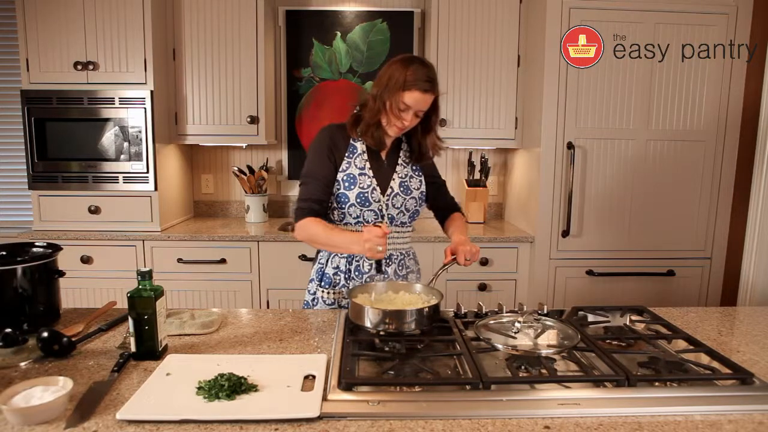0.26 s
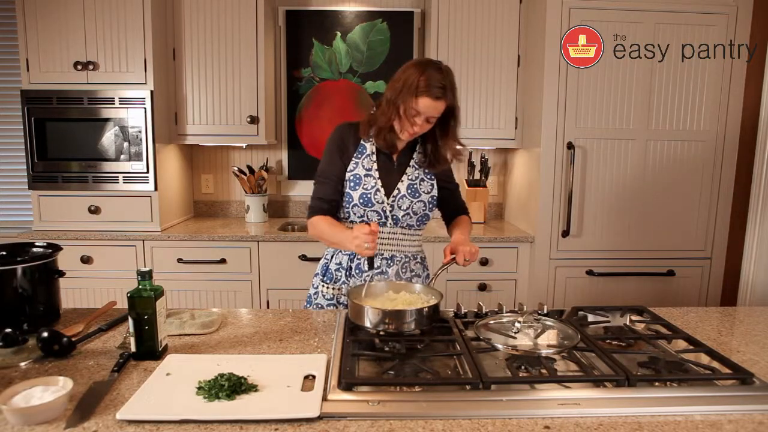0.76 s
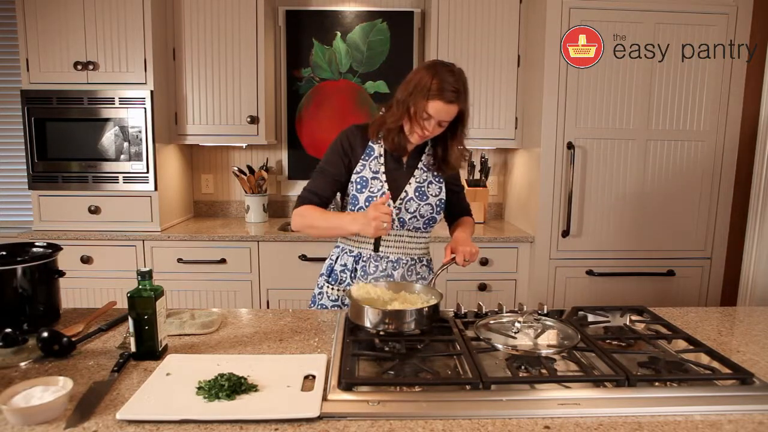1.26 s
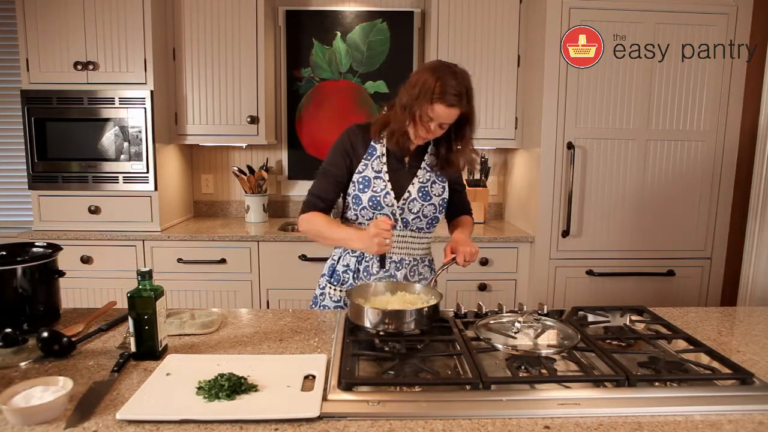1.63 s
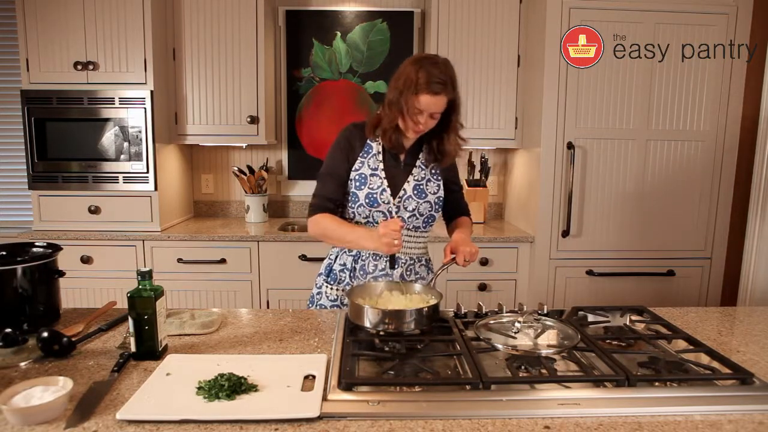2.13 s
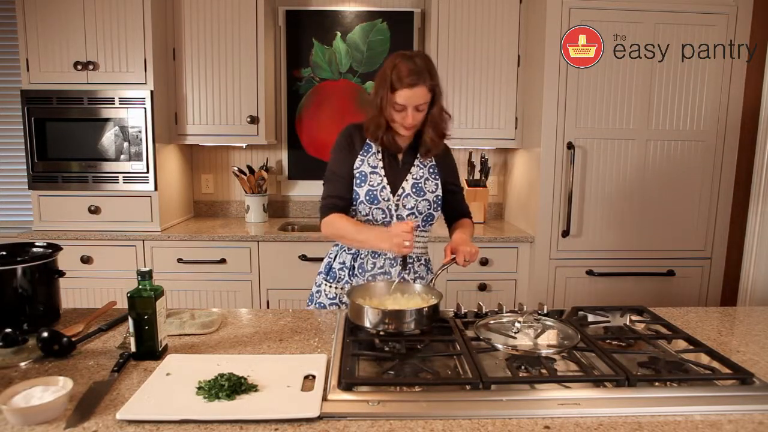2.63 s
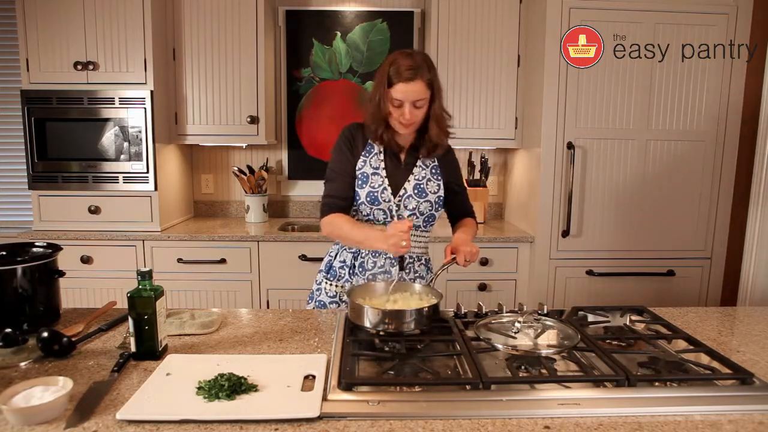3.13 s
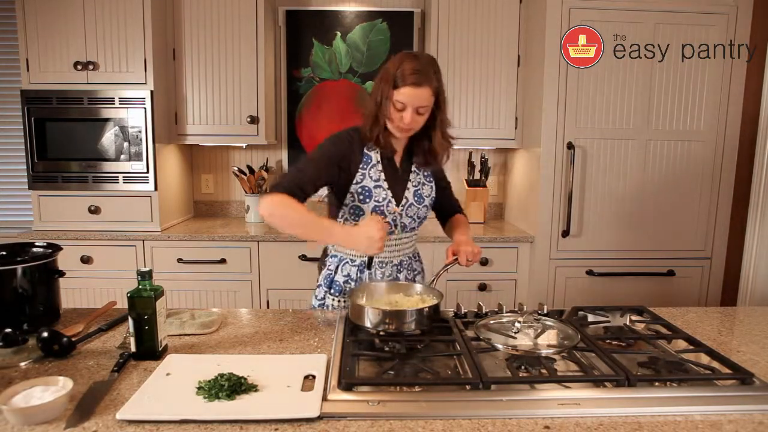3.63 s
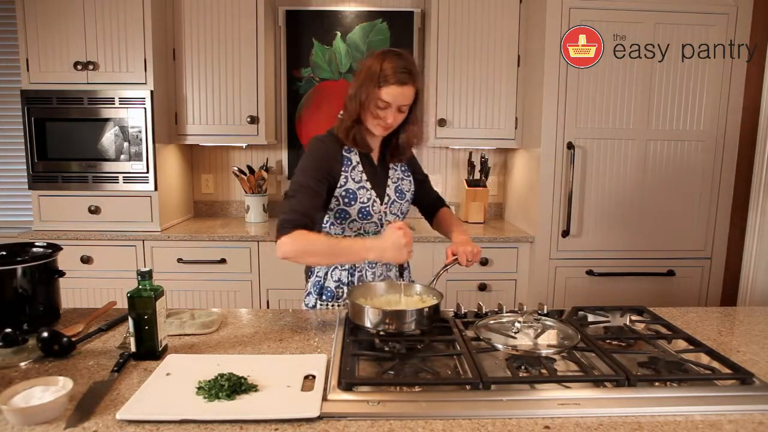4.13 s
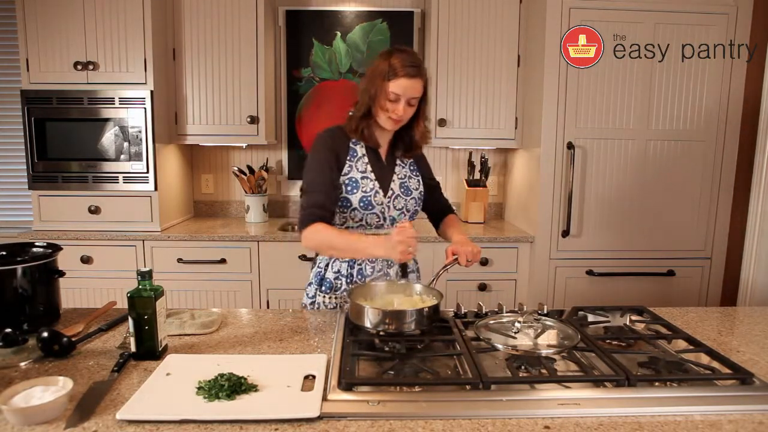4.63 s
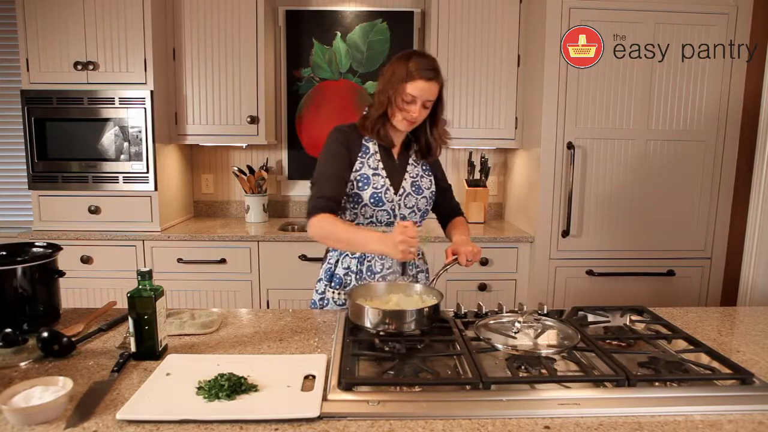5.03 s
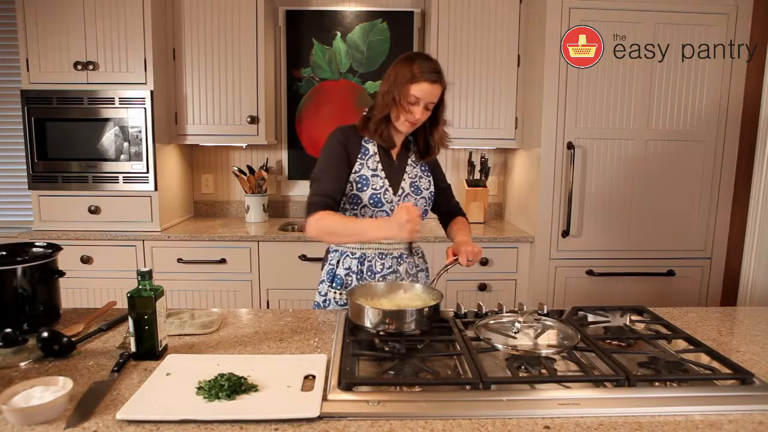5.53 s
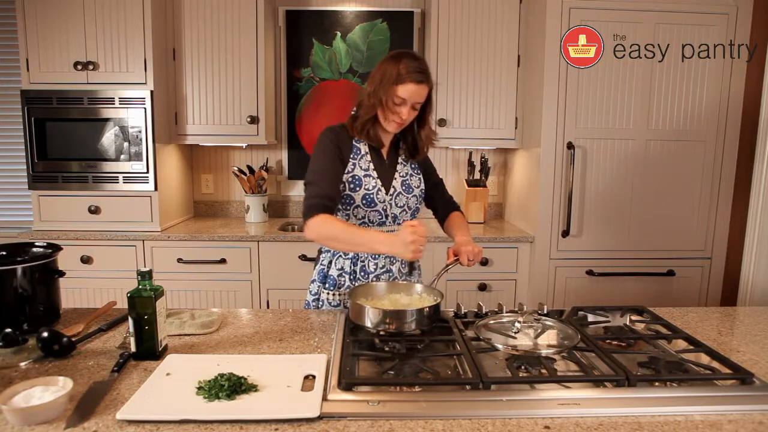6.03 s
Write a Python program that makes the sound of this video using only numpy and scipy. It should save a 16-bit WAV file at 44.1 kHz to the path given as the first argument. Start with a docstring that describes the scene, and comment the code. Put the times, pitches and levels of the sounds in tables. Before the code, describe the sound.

In a hard-walled home kitchen, a steel masher works soft vegetables in a stainless pan on a gas hob. Two or three irregular strokes a second clack on metal, each bumping the pan against its iron grate. Hard blows are short and dry, lighter ones ring thinly. Brief scrapes drag through the mash between strokes. One microphone hears the direct sound and a short lively room over faint hiss.

```python
"""A hard-walled kitchen: a steel masher pounds soft vegetables in a stainless pan on a gas hob.
Two to three strokes a second clack on the steel, bump the pan on its iron grate and scrape the mash:
noise bursts, decaying tones and sparse slips pass through resonances of steel and grate.
Hard blows are short and dry, light or cushioned ones ring; firm drags are bright, light ones are dull.
Decaying noise makes the room's answer; one microphone hears it all over a faint hiss."""
import sys
import numpy as np
from scipy import signal
from scipy.fft import rfft, irfft, next_fast_len
from scipy.io import wavfile

SR = 44100
rng = np.random.default_rng(int(sys.argv[2]) if len(sys.argv) > 2 else 0)


def int16_out(signal):
    """Quantize to a 16-bit WAV file."""
    q = np.round(np.clip(np.atleast_2d(signal).T, -1, 1) * 32767)
    wavfile.write(sys.argv[1], SR, q.astype(np.int16))


N = 276967
T = np.arange(SR * 3 // 4) / SR  # time axis of one short sound, s
SIZE = 2 ** 15  # samples in a filtered short sound
HZ = np.fft.rfftfreq(SIZE, 1 / SR)

# Masher meets pan. Each row: start in s, level in dB, low clang in dB, treble slope in dB per octave,
# favoured partial in Hz, push on the grate in dB.
CLACKS = [(0.1025, -31.5, -2.5, -33, 3400, -20.5), (0.1709, -13, -12, -9.5, 7260, -27),
          (0.2076, -19, -3.5, 2.5, 4720, -42), (0.539, -43, 7, -17, 3300, -34),
          (0.5485, -29.5, 8, -2, 1037, -26), (0.607, -21.5, -11, -3, 2430, -23),
          (0.6766, -23, -10.5, -1, 7740, -37), (1.4207, -19, 9.5, 3, 1167, -18.5),
          (1.4666, -13.5, -3.5, 1.5, 1295, -17), (1.4933, -16, -0.5, 1, 8040, -31),
          (1.5666, -26, -10, 1, 2540, -50), (1.635, -24, 1, 3.5, 4480, -37),
          (1.9734, -9, 0.5, 5, 1342, -24), (2.0128, -14.5, 2.5, -0.5, 3820, -25.5),
          (2.0755, -11.5, -6, -7, 692, -20.5), (2.5241, -17.5, -22, -1.5, 3000, -32.5),
          (2.5703, -35, 3, -16.5, 3400, -22), (2.9155, -6.5, -2, -1, 7500, -33.5),
          (2.9387, -21.5, 0, -1, 5100, -33.5), (2.9747, -20.5, -14, 3, 5400, -30.5),
          (3.054, -23, -41.5, -7.5, 4630, -47), (3.4971, -9, 0.5, -3.5, 3720, -26.5),
          (3.6703, -18, -13, -6, 7900, -32), (3.7364, -28.5, -24, 0.5, 7500, -34),
          (4.124, -4.5, -10, -11.5, 1868, -27), (4.2351, -29.5, -2, -5.5, 3700, -48.5),
          (4.596, -18.5, -7.5, -4.5, 3055, -23), (4.635, -23, -4, -17, 1346, -23.5),
          (4.6919, -14.5, -12, -1.5, 3700, -31), (4.9596, -11.5, -4.5, 1.5, 3220, -18.5),
          (4.9982, -23.5, 10, -6.5, 1153, -22.5), (5.2648, -13, 3.5, 0, 1162, -21.5),
          (5.2989, -16.5, -7.5, 3.5, 1160, -28.5), (5.3481, -14, -3.5, -14, 1642, -18),
          (5.6024, -20.5, 10.5, 5, 5420, -33), (5.6291, -7, -12.5, -3, 2900, -21.5),
          (5.681, -27.5, 10, 0.5, 3010, -19.5), (5.7289, -26.5, -4.5, -3.5, 4160, -33),
          (5.9497, -10, -15, 3, 7600, -28), (5.9959, -29, 13, 0.5, 2880, -21),
          (6.179, -10.5, 1.5, 0, 4140, -23), (6.2403, -16.5, -0.5, -3.5, 5800, -30)]
# Resonances of steel pan and masher. Each row: centre in Hz, half-width at half gain in Hz, level in dB.
STEEL = [(707, 360, 3), (1220, 140, 0.5), (1455, 94, 3), (1528, 46, 1.5), (1760, 140, 6), (2046, 68, 5),
         (2226, 59, -1), (2612, 78, -6), (2953, 384, 8), (3444, 160, 5), (3607, 183, 10), (4320, 370, 7.5),
         (4710, 105, 4.5), (5033, 69, 8.5), (5350, 88, 2), (6040, 128, -1.5), (6790, 1150, 4),
         (9194, 77, 3.5), (9950, 72, -9), (11050, 120, -38.5), (12300, 530, -9), (15200, 200, -16)]
# Spectrum of steel contact. Each row: frequency in Hz, relative density in dB per Hz.
STEEL_COLOUR = [(200, -26), (700, -3.5), (1200, 1), (2500, 2.5), (4500, -4.5), (5600, 0), (7600, 0),
                (8450, -3), (9200, 1), (12700, 3), (13800, -2), (15500, -11)]
# Lasting tones of the pan's wall. Each row: frequency in Hz, relative level in dB, t60 in s.
WALL_TONES = [(1110, -8.5, 0.15), (1223, -10, 0.29), (1348, -2.5, 0.32), (1976, 0.5, 0.41),
              (2485, -2.5, .35), (2940, -0.5, .4), (3634, 0, .55), (3760, -2.5, 0.26), (3900, -3.5, 0.51),
              (4800, 2, 0.27)]
# Blows above the pivot stay pressed on the steel: dB of ring lost per dB.
RING_PIVOT_DB, PRESS_DAMPING_DB_PER_DB = -18, 0.41
# The favoured partial stands out more, the duller the contact.
LIFT_DB, LIFT_PER_SLOPE, MAX_LIFT_DB = 10, 0.59, 22.5
# t60 of the head's chatter at the pivot level; it halves for each such step harder.
CONTACT_T60_S, HALVING_DB = 0.019, 19


def clacks(direct_db=-28, ring_db=-26.5, shiver_db=-35, wall_db=-39, sing_db=-46, ring_lift=0.66,
           crack_clang_db=2, crack_edge_db=7, steel_share=0.56, bare_share=0.12):
    """Steel on steel: a dry crack, a shiver that the mash soon damps, and the pan's ring in the room."""
    track = np.zeros(N)
    wall_tones = np.array([amp(db) * tone(hz, t60) for hz, db, t60 in WALL_TONES])
    direct_path_db = along([(700, 0.022), (1800, crack_clang_db), (3500, 0.008), (13000, crack_edge_db)], HZ)
    for start_s, db, clang_db, slope_db, partial_hz, _ in CLACKS:
        # where and how hard the masher lands sets the colour
        treble_db = slope_db * np.log2(np.clip(HZ, 3500, 10000) / 3500)
        hardness_db = along([(1600, clang_db), (3500, 0.0084)], HZ) + treble_db
        colour = causal(amp(db + hardness_db + along(STEEL_COLOUR, HZ))) * np.sqrt(SR)
        lift_db = min(LIFT_DB - LIFT_PER_SLOPE * slope_db, MAX_LIFT_DB)
        partial_db = favoured(partial_hz, lift_db, width=0.04)
        free_db = PRESS_DAMPING_DB_PER_DB * (RING_PIVOT_DB - db)

        # the head chatters as it seats on the steel, partly bare of the cushioning mash
        contact_t60 = CONTACT_T60_S * 2 ** ((RING_PIVOT_DB - db) / HALVING_DB)
        chatter = amp(direct_db) * burst(rise=0.0031, t60=contact_t60)
        body = struck(STEEL, spread_db=6.5) ** steel_share
        contact = causal(body * amp(partial_db + direct_path_db - bare_share * treble_db))
        add(track, start_s, through(chatter, colour * contact))

        # then the pan sounds freely: dense modes, lasting tones, favoured partial
        steel = causal(struck(STEEL, spread_db=5))
        shiver = amp(shiver_db) * through(burst(rise=0.022, t60=0.063), steel)
        ring = amp(ring_db) * irfft(steel * kitchen())
        wall = amp(wall_db) * unit(rng.standard_normal(len(WALL_TONES)) @ wall_tones)
        sing = wall + amp(sing_db) * tone(partial_hz, t60=0.32)
        freedom = causal(amp(free_db + ring_lift * partial_db))
        add(track, start_s, through(shiver + ring + sing, colour * freedom))
    return track


# Resonances of the loaded pan on its grate. Each row: centre in Hz, half-width at half gain in Hz, level in dB.
GRATE = [(65, 13, -7), (102, 8.9, -0.5), (159.4, 17, 3.5), (197.4, 49.4, -2.5), (273.8, 11.2, 4),
         (356, 180, -7.5), (424.2, 10.4, 5.5), (465.5, 11.7, 0), (500, 124, -1.5), (702.3, 20, 5),
         (817, 56, 6), (1048, 57, 2), (1270, 150, -1.5), (1346, 58, 3.5)]
# Spectrum of a bump. Each row: frequency in Hz, relative density in dB per Hz.
BUMP_COLOUR = [(25, -3), (70, 2), (110, 7.5), (280, 9), (450, 3.5), (850, -2.5), (1400, -4), (2000, -13),
               (5000, -99)]
# Modes of the pan's base. Each row: frequency in Hz, lift in dB, change of lift in dB per dB of clatter.
BASE_MODES = [(710, 2, 0.64), (838, 4.5, -0.15), (1186.5, 6.5, 0.35)]
# Low bumps of the pan on the grate, with no separate clack. Each row: start in s, level in dB, clatter in dB.
LOW_BUMPS = [(0.004, -36.5, -8), (0.473, -34.5, -18), (0.752, -29.5, 8), (0.925, -36, 0),
             (1.334, -30, -4.5), (1.37, -37, 13.5), (2.216, -37, 12.5), (3.939, -37, -9.5)]
# The grate clatters with the clang; KNOCK_SHARE of it in the low mids.
CLATTER_DB, CLATTER_FOLLOWS, KNOCK_SHARE = -2.5, 0.54, 0.27


def bumps(direct_db=-17, room_db=-14, sing_db=-31):
    """Every push goes through the mash and knocks the pan against the grate; the base rings briefly."""
    track = np.zeros(N)
    pushes = []
    for start_s, db, clang_db, _, _, push_db in CLACKS:
        clatter_db = CLATTER_DB + CLATTER_FOLLOWS * (db + clang_db - push_db)
        pushes.append((start_s, push_db, clatter_db))
    base_ring = amp(room_db + sing_db) * sum(tone(hz, t60=0.085) for hz, _, _ in BASE_MODES)
    for start_s, db, clatter_db in pushes + list(LOW_BUMPS):
        knock_db = KNOCK_SHARE * clatter_db
        base_db = sum(favoured(hz, lift_db + shift * clatter_db, width=0.035)
                      for hz, lift_db, shift in BASE_MODES)
        hardness_db = along([(250, 0), (500, knock_db), (800, knock_db), (1200, clatter_db)], HZ)
        colour = amp(db + hardness_db + along(BUMP_COLOUR, HZ) + base_db)
        grate = causal(struck(GRATE, spread_db=3))
        direct = amp(direct_db) * burst(rise=0.0011, t60=0.167)[:SIZE]
        push = direct + amp(room_db) * irfft(kitchen())
        add(track, start_s, through(through(push, grate) + base_ring, causal(colour) * np.sqrt(SR)))
    return track


# Scrapes through the mash along the steel; the weakest, near 4.4 s, is only a faint breath.
# Each row: start in s, length in s, level in dB.
SCRAPES = [(0.528, 0.15, -40), (0.693, 0.074, -41), (1.349, 0.09, -38.5), (1.411, 0.11, -27),
           (1.606, 0.051, -36), (2.09, 0.063, -32), (2.593, 0.063, -34), (3.049, 0.06, -33.5),
           (3.716, 0.049, -32), (4.09, 0.12, -41), (4.43, 0.12, -50.5), (4.577, 0.045, -38.5),
           (4.671, 0.13, -39.5), (4.933, 0.029, -39), (5.014, 0.079, -34.5), (5.369, 0.05, -33.5),
           (5.727, 0.047, -34.5), (6.03, 0.039, -32.5), (6.178, 0.084, -29)]
# Stronger rows are brighter: dB per octave for each dB over the pivot.
SCRAPE_PIVOT_DB, SCRAPE_BRIGHTENS = -35, 0.99
# Weak, dull rows get a soft breathy band: dB of lift per dB per octave of dullness.
BREATH_HZ, BREATH_LIFT = 803, 1.1


def scrapes(slips_per_s=1400, room_db=-1, uneven_db=5):
    """Tiny random slips swell and fade, each one passed through the steel's resonances."""
    track = np.zeros(N)
    for start_s, length_s, db in SCRAPES:
        slope_db = SCRAPE_BRIGHTENS * (db - SCRAPE_PIVOT_DB)
        steel = struck(STEEL, spread_db=4.5)
        tilt_db = slope_db * np.log2((HZ + 500) / 4000)
        breath_db = favoured(BREATH_HZ, BREATH_LIFT * max(-slope_db, 0), width=0.14)
        colour = amp(along(STEEL_COLOUR, HZ) + tilt_db + breath_db)
        swell = np.sin(np.pi * np.minimum(T / length_s, 1))
        slips = rng.standard_normal(len(T)) * (rng.random(len(T)) < slips_per_s / SR)
        slips = slips * amp(uneven_db * rng.standard_normal(len(T)))
        rub = unit(through(slips * swell, causal(steel * colour)))
        in_room = through(rub, 1 + amp(room_db) * kitchen())
        add(track, start_s, amp(db) * np.sqrt(length_s * SR / 2) * in_room)  # longer drag, more energy
    return track


# Decay of the room. Each row: frequency in Hz, t60 in s.
KITCHEN_DECAY = [(100, 1), (260, 0.8), (700, 0.79), (1840, 0.47), (3800, 0.5), (7000, 0.29), (12800, 0.14)]


def kitchen():
    """A new random response of the room: decaying noise whose treble dies first."""
    hz, t, z = signal.stft(rng.standard_normal(len(T)), SR, nperseg=256)
    t60 = along(KITCHEN_DECAY, hz)[:, None]
    even_energy = np.sqrt(2 * np.log(1000) / (t60 * SR))  # same energy at any t60
    fade = amp(-60 * t / t60) * even_energy
    return rfft(signal.istft(z * fade, SR)[1], SIZE)


# Background spectrum. Each row: frequency in Hz, relative density in dB per Hz.
HISS = [(25, -27), (60, -11), (150, -7), (400, -8), (800, -15.5), (1500, -19.5), (3500, -22.5), (6000, -30),
        (15000, -30)]


def floor(level_db=-60):
    """Low room rumble and an even hiss, as shaped noise."""
    hz = np.fft.rfftfreq(N, 1 / SR)
    noise = irfft(rfft(rng.standard_normal(N)) * amp(along(HISS, hz)), N)
    return amp(level_db) * np.sqrt(N) * unit(noise)


def struck(modes, spread_db):
    """Gain of a resonant body; each point of contact shares the blow among its modes anew."""
    shares_db = spread_db * rng.standard_normal(len(modes))
    shares_db -= 10 * np.log10(np.mean(amp(shares_db) ** 2))
    peaks = [amp(db + share_db) / (1 + ((HZ - centre_hz) / width_hz) ** 2)
             for (centre_hz, width_hz, db), share_db in zip(modes, shares_db)]
    return np.sqrt(np.sum(np.square(peaks), axis=0) + 0.0008)


def favoured(centre_hz, lift_db, width):
    """dB by which a band around centre_hz stands out; width is a share of centre_hz."""
    return lift_db / (1 + ((HZ - centre_hz) / (width * centre_hz)) ** 2)


def tone(hz, t60):
    """One free mode of the steel: a decaying sine of energy 1."""
    t = T[:SIZE]
    return unit(np.sin(2 * np.pi * hz * t) * amp(-60 * t / t60))


def burst(rise, t60):
    """The chatter of one contact: noise with a rise and decay in seconds, energy 1."""
    return unit(rng.standard_normal(len(T)) * (1 - np.exp(-T / rise)) * amp(-60 * T / t60))


def causal(gain):
    """Minimum-phase response with this gain: it sounds only after its cause."""
    cepstrum = irfft(np.log(np.maximum(gain, 1e-6)))
    half = len(cepstrum) // 2
    folded = np.r_[cepstrum[0], 2 * cepstrum[1:half]]
    return np.exp(rfft(folded, 2 * half))


def through(x, response):
    """A short sound passed through a response."""
    return irfft(rfft(x, SIZE) * response)


def add(track, start_s, sound):
    """Mix a sound into the track, cut at its end."""
    part = track[max(0, round(start_s * SR)):][:len(sound)]
    part += sound[:len(part)]


def along(points, hz):
    """(Hz, value) points interpolated on a log frequency axis."""
    f, v = np.transpose(points)
    return np.interp(np.log(hz + 1), np.log(f), v)


def amp(db):
    """Decibels to gain."""
    return 10 ** (np.asarray(db) / 20)


def unit(x):
    """x scaled to an energy of 1."""
    return x / np.linalg.norm(x)


def scene():
    """Both channels carry the same sound; a faint steady noise is added to one, subtracted from the other."""
    mono = clacks() + bumps() + scrapes() + floor()
    side = floor(level_db=-73)
    return np.array([mono + side, mono - side])


CLIP_LEVEL, TOP_HZ = 0.88, 15800


def record(dry):
    """The recorder clips the highest peaks and keeps nothing above its band limit."""
    size = next_fast_len(N + SR)
    held = np.clip(dry, -CLIP_LEVEL, CLIP_LEVEL)
    in_band = np.fft.rfftfreq(size, 1 / SR) < TOP_HZ
    return irfft(rfft(held, size) * in_band, size)[:, :N]


dry = scene()
out = record(dry)
int16_out(out)
```